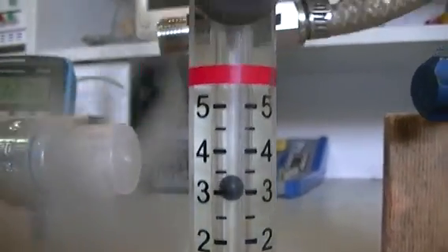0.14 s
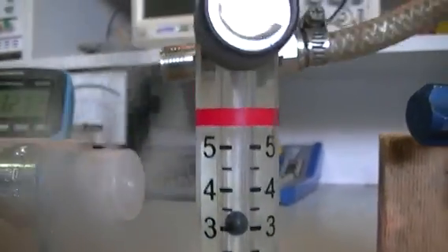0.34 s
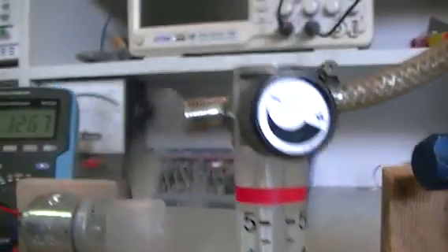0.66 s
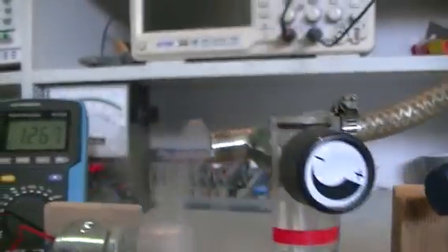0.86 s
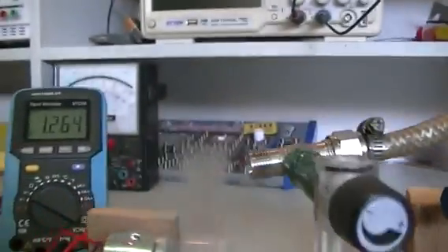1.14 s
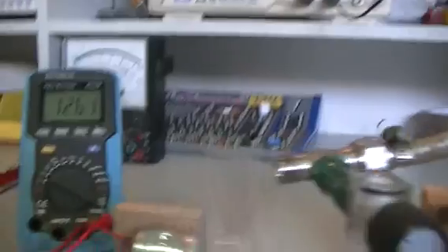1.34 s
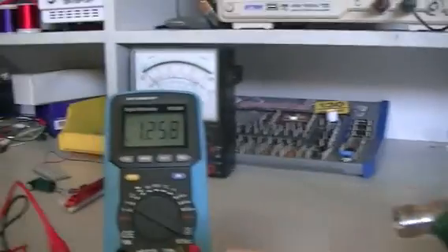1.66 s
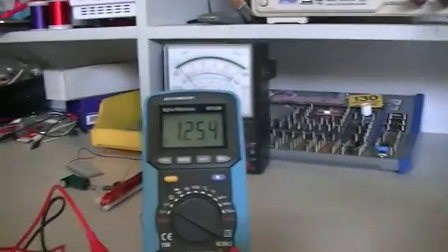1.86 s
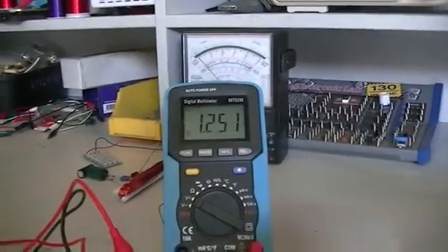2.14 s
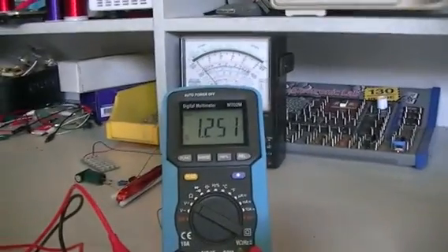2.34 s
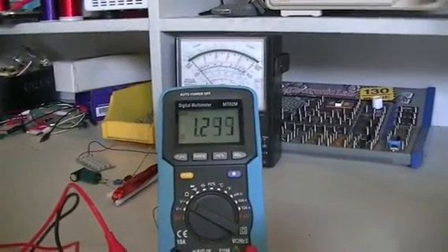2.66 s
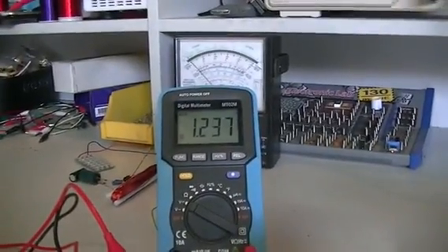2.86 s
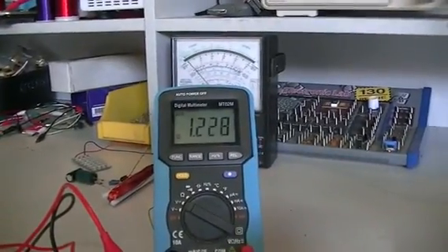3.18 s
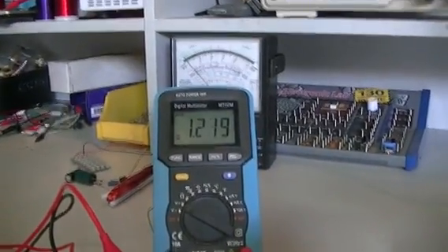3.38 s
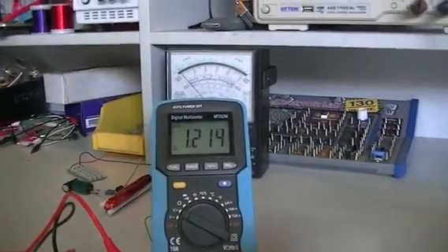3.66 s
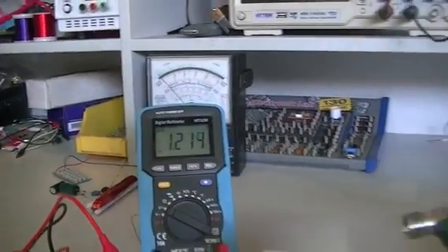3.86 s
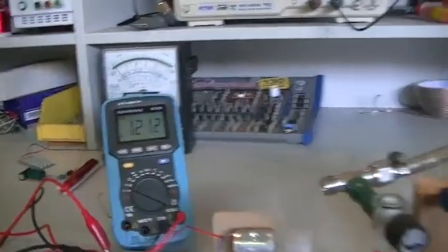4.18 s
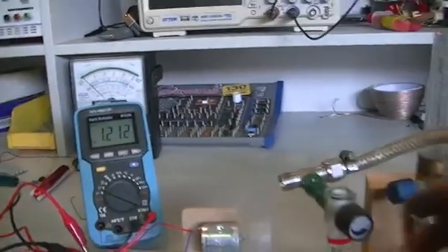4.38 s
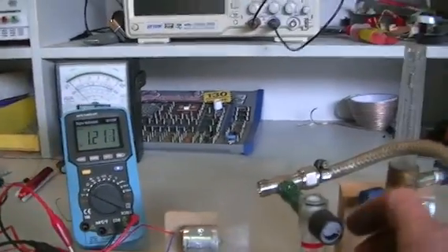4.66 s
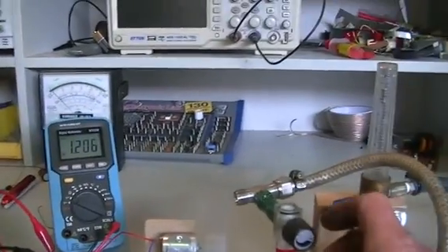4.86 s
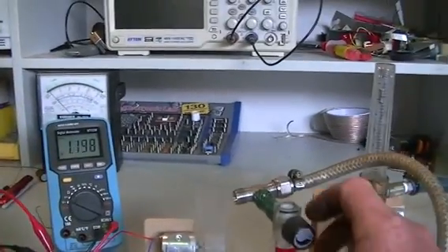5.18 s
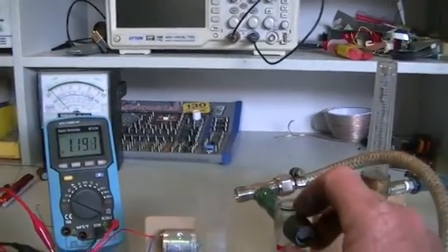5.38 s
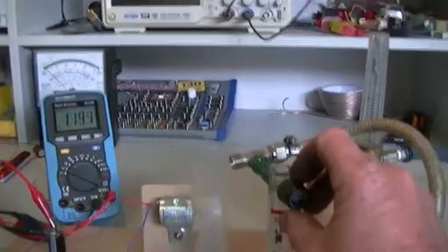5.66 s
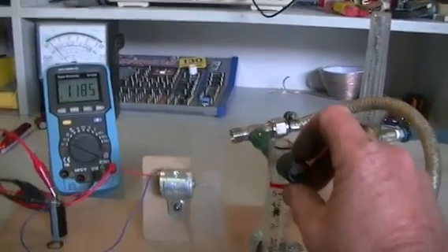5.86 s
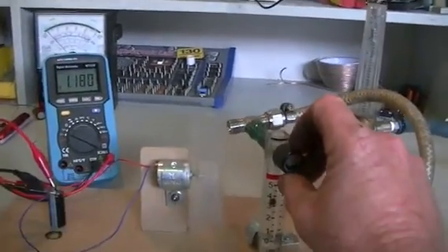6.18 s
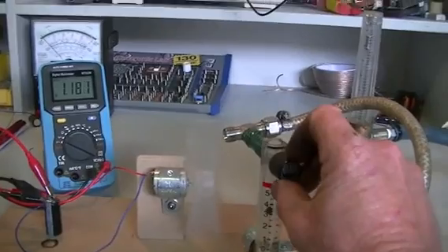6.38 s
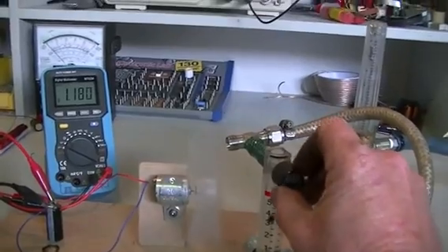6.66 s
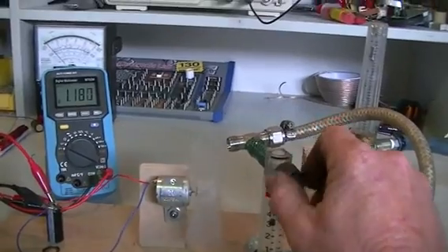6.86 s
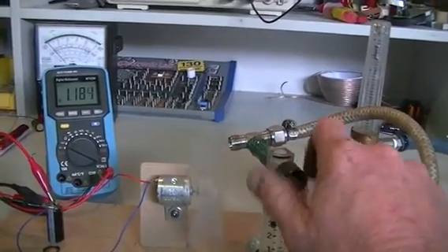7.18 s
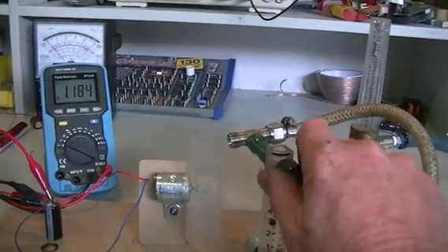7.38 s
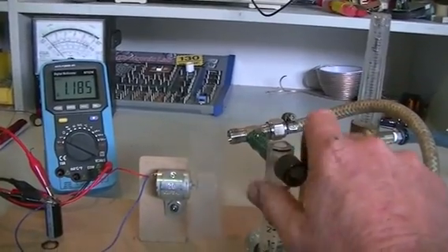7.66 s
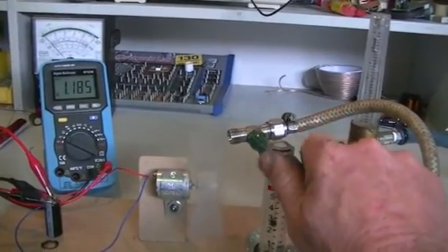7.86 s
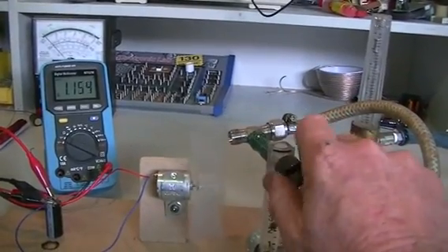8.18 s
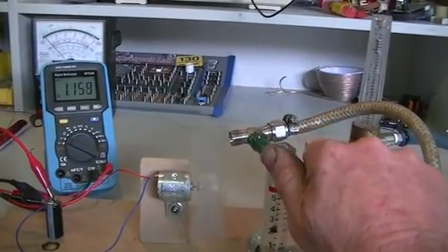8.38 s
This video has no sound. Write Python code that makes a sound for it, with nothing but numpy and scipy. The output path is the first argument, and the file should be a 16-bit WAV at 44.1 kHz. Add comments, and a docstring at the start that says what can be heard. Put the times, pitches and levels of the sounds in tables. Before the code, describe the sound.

A loud, steady jet of compressed air hisses up close onto a small fan, its bright hollow whistling colour sliding downward as the microphone moves.

```python
"""A hiss up close first: a steady jet of compressed air from a nozzle onto a small fan on a workbench.
The microphone starts at the nozzle, moves along the bench, then draws back. The jet is noise, coloured
for each place; close reflections comb it with notches that slide down and partly back.
The hiss throbs in some bands and eddies make it uneven. Behind it the fan hums faintly, sinking in pitch,
as sines locked to its turning rate."""
import sys
import numpy as np
from scipy import signal
from scipy.fft import rfft, irfft
from scipy.io import wavfile
from scipy.ndimage import uniform_filter1d

SR = 44100
rng = np.random.default_rng(int(sys.argv[2]) if len(sys.argv) > 2 else 0)


def wrap_up_sound(samples):
    """Save the sound to the file named by the first command line argument, as 16-bit audio."""
    columns = np.atleast_2d(samples).T
    # keep every value between -1 and 1, then stretch to whole-number steps
    tamed = np.clip(columns, -1, 1)
    steps = np.round(tamed * 32767).astype(np.int16)
    wavfile.write(sys.argv[1], SR, steps)


N = 376173  # samples, about 8.5 s

# broad spectrum of the jet, levels relative:
# pitch_hz, nozzle_db, bench_db, drawn_back_db
JET_COLOUR = [(347, -79, -81, -81.5), (457, -71.5, -72.5, -74), (725, -70, -72, -68.5),
              (1030, -68, -68, -69), (2630, -68, -64.5, -65.0), (4040, -61.4, -63.4, -62),
              (5130, -66, -58, -56.5), (8200, -54.5, -57.5, -56.5), (9780, -56, -63, -56.5),
              (10690, -69, -71.5, -67.5), (12600, -63, -64.5, -67.5), (13750, -68.9, -71.1, -72.4),
              (14500.0, -82.5, -86.8, -88.8), (15300.0, -77, -79, -79.7)]
# resonances of the nozzle and the things around it, heights above the broad spectrum:
# pitch_hz, width_hz, nozzle_db, bench_db, drawn_back_db
NOZZLE_RESONANCES = [(404, 43, 4, 4.5, 5), (1095, 53, 4.5, -2, 6.5), (1189, 120, 7, 2.5, 7),
                     (1613, 230, 3.5, 6.5, 3), (1887, 330, 3.5, 0.6, 6), (2970, 240, 1.5, 1.5, 5.5),
                     (3425, 360, 4, 5, 7), (4300, 260, 6, 3, 1), (4610, 145, 4.5, 3.5, 4),
                     (4944, 320, 7, 6, -1), (5323, 550, 8, 5, 5.5), (6900, 240, 1, 7.5, 3),
                     (7240, 300, 8, 4.5, 3), (7560, 380, 1, 1.8, 5), (9110, 290, 5.5, -0.2, 5),
                     (9760, 260, .3, 5, 3), (11130, 500, 0.5, 1, -3.5), (12100, 500, 1.5, -5.5, 2.5)]
JET_DB = -16  # rms of the whole hiss
FRAME, HOP = 1024, 256  # samples
SWING_TILT_DB = .3  # an octave: brighter as the microphone swings past the jet between two places
# towards the end the low part of the hiss fills out
FILL_FROM_S, FILL_DB_PER_S, FILL_BELOW_HZ = 6.5, .9, 1500


def jet(bass_hz=290, bass_order=1.75, pivot_hz=6000):
    """Turbulent hiss coloured for three places, blended as the microphone moves, combed by reflections."""
    source = turbulence()
    echoed = [shelves(source) for _ in range(3)]  # other echoes at each place
    hz, t, bands = signal.stft(echoed, SR, nperseg=FRAME, noverlap=FRAME - HOP)
    place = microphone_place(t)
    level_db, _, _ = heard_at(place)
    shares = np.maximum(1 - abs(np.clip(place, 0, 2) - np.arange(3)[:, None]), 0)
    bands = (bands * shares[:, None]).sum(0)

    colour_db = read(JET_COLOUR, hz).T
    for centre, width, *heights_db in NOZZLE_RESONANCES:
        colour_db = colour_db + np.outer(bell_curve(hz, centre, width), heights_db)

    between = np.sin(np.pi * place) ** 2
    octaves = np.log2(np.maximum(hz, bass_hz) / pivot_hz)
    tilt_db = SWING_TILT_DB * np.outer(octaves, between)
    low_part = np.exp(-(hz / FILL_BELOW_HZ) ** 2)
    fill_db = FILL_DB_PER_S * np.outer(low_part, np.maximum(t - FILL_FROM_S, 0))
    # so thin a jet radiates little bass
    bass = np.minimum(hz[:, None] / bass_hz, 1) ** bass_order

    total_db = colour_db @ shares + level_db + tilt_db + fill_db + comb_db(hz, t)
    hiss = signal.istft(bands * gain_of(total_db) * bass, SR, nperseg=FRAME, noverlap=FRAME - HOP)[1][:N]
    return gain_of(JET_DB) * evened(hiss)


# how strongly each part of the hiss takes part in the throb, negative in opposite phase:
# pitch_hz, depth_factor
THROB_BANDS = [(3800, -0.23), (5000, 0.95), (5900, 0.3), (6800, 1.57), (8000, 0.7), (9100, 0.5),
               (9900, -2.5), (11000, 0.8), (14000, .2)]
THROB_HZ, THROB_SAG_HZ_PER_S = 29.78, 0.269  # rate at the start, and its slowing


def turbulence(eddy_db=0.62, grit_db=0.97, surge_db=0.29, surge_hz=14, throb_gain=1.18, flutter_db=0.53):
    """White noise that throbs and flutters band by band, while eddies lift one band or another."""
    hz, t, bands = signal.stft(rng.standard_normal(N), SR, nperseg=256, noverlap=192)
    _, depth, _ = heard_at(microphone_place(t))
    rate = THROB_HZ - THROB_SAG_HZ_PER_S * t
    phase = 2 * np.pi * np.cumsum(rate) * t[1]  # t[1] is the time step
    share = read(THROB_BANDS, hz).T
    throb = 1 + throb_gain * share * depth * np.cos(phase)

    eddies_db = eddy_db * patches(bands.shape, frames_size=16, bins_size=10)
    eddies_db = eddies_db + grit_db * patches(bands.shape, frames_size=2, bins_size=12)
    # the bands that throb also flutter at random
    flutter = abs(share) * patches(bands.shape, frames_size=18, bins_size=26)
    eddies_db = eddies_db + flutter_db * flutter

    hiss = signal.istft(bands * throb * gain_of(eddies_db), SR, nperseg=256, noverlap=192)[1][:N]
    return hiss * gain_of(surge_db * wander(surge_hz))


# the path of the microphone, place 0 at the nozzle, 1 along the bench, 2 drawn back:
# time_s, place
MICROPHONE_PATH = [(0, 0), (.4, .22), (1.25, .16), (1.6, 0.95), (3.55, 1.01), (4.3, 1.93)]


def microphone_place(t):
    """Where the microphone is at the times t, gliding between the points of its path."""
    place, = follow(MICROPHONE_PATH, t)
    return place


# what changes from place to place, level relative, depth before the factors of the throb:
# place, level_db, throb_depth, notch_spacing_hz
PLACE_SETTINGS = [(0, .2, .15, 2600), (.22, .1, .14, 2750), (1, .1, 0.19, 2500), (1.6, -1.2, .12, 2350),
                  (2, -.3, .08, 2100)]


def heard_at(place):
    """Level, throb depth and notch spacing, which vary with the distance along the path."""
    return follow(PLACE_SETTINGS, place)


# how well the close surfaces reflect:
# pitch_hz, share
SURFACE_REFLECTANCE = [(2000, .05), (5000, 1.05), (9000, 1.1), (11000, .55), (15000, .25)]
# the slide of the comb as the microphone moves, depth before the reflectance:
# time_s, middle_notch_hz, depth_db
NOTCH_SLIDE = [(0, 9370, 6), (.45, 8680, 9.5), (.7, 7940, 11), (.9, 7620, 7.5), (1.1, 6730, 4.5),
               (1.35, 6100, 5.5), (1.9, 5800, 5.8), (3.55, 5820, 6), (4.1, 6400, 7), (4.6, 6700, 3),
               (5.5, 7000, 0)]
# the crest under the middle notch whistles and slides with it: its lowest pitch,
# its rise with the notch at its highest, and the power of the law between
CREST_HZ, CREST_RISE_HZ, CREST_BEND = 4980, 1400, .6
CREST_DB, CREST_FADE_HZ = 3.2, 2600  # height at the nozzle before the fade, and the notch rise that fades it
CREST_SHARE_FAR = .2  # share of that height left with the microphone drawn back


def comb_db(hz, t, notch_width=.4, crest_width_hz=550):
    """Reflections cancel the direct hiss at evenly spaced notches, which slide as the microphone moves."""
    middle, depth_db = follow(NOTCH_SLIDE, t)
    place = microphone_place(t)
    _, _, spacing = heard_at(place)
    off_notch = np.sin(np.pi * (hz[:, None] - middle) / spacing)
    notch = 1 / (1 + (off_notch / notch_width) ** 2)
    average = notch_width / np.hypot(1, notch_width)  # between the notches the reflections add
    notches_db = depth_db * read(SURFACE_REFLECTANCE, hz).T * (average - notch)

    raised = middle - middle.min()
    crest_hz = CREST_HZ + CREST_RISE_HZ * (raised / raised.max()) ** CREST_BEND
    crest = bell_curve(hz[:, None], crest_hz, crest_width_hz)
    crest_share = np.interp(place, [0, 2], [1, CREST_SHARE_FAR])
    crest_db = CREST_DB * crest_share * np.exp(-(raised / CREST_FADE_HZ) ** 2)
    return notches_db + crest_db * crest


def shelves(x, wet_db=-9.0, t60=0.053, lowest_hz=1100):
    """Small echoes from shelves and instruments ripple the treble finely; long waves pass them by."""
    t = np.arange(SR // 8) / SR
    taps = rng.standard_normal(len(t)) * gain_of(-60 * t / t60) * (t > .003)
    taps = signal.lfilter(*signal.butter(1, lowest_hz, "high", fs=SR), taps)
    echoes = signal.fftconvolve(x, taps / np.linalg.norm(taps))[:N]
    wet = gain_of(wet_db)
    return (x + wet * echoes) / np.hypot(1, wet)


# faint low tones that swell and fade, sinking with the fan, levels before the waver:
# middle_s, length_s, multiple_of_turning_rate, level_db
FAN_HUMS = [(2.3, 1.4, 2, -69), (4.4, .6, 2, -70.5), (6.1, 1.4, 2.79, -66), (6.1, 1.4, 2.26, -72),
            (6.4, 1.8, 4.31, -66), (8.2, 1.6, 2, -71)]
# the blade tone swells now and then, levels before the waver:
# middle_s, length_s, level_db
BLADE_SWELLS = [(.05, 0.25, -63), (1.14, .24, -57), (1.47, .24, -57), (1.85, .15, -58), (2.62, .18, -59),
                (2.97, .2, -60), (3.47, 0.27, -56), (3.94, .2, -60), (4.38, .2, -63)]
FAN_HZ, FAN_SAG_HZ_PER_S = 78.6, 1.17  # turns a second at the start, and their slowing
BLADES = 3
BLADE_NEAR_DB, BLADE_FAR_DB = -66.5, -78  # blade tone between swells, at the nozzle and drawn back


def fan(shaft_db=-83, twice_db=-80, waver_db=2.5):
    """The sagging rotor hums at one, two and three times its turning rate; other faint tones come and go."""
    t = np.arange(N) / SR
    angle = 2 * np.pi * np.cumsum(FAN_HZ - FAN_SAG_HZ_PER_S * t) / SR
    blade_db = np.interp(microphone_place(t), [0, 2], [BLADE_NEAR_DB, BLADE_FAR_DB])
    tones = gain_of(shaft_db) * np.sin(angle)
    tones = tones + gain_of(twice_db) * np.sin(2 * angle)
    tones = tones + gain_of(blade_db) * np.sin(BLADES * angle)
    for middle, length, multiple, db in FAN_HUMS:
        tones = tones + gain_of(db) * swell(t, middle, length) * np.sin(multiple * angle)
    for middle, length, db in BLADE_SWELLS:
        tones = tones + gain_of(db) * swell(t, middle, length) * np.sin(BLADES * angle)
    # root 2 makes the levels rms
    return np.sqrt(2) * tones * gain_of(waver_db * wander(rate_hz=5.5))


def swell(t, middle, length):
    """A bell-shaped rise and fall."""
    return np.exp(-(2 * (t - middle) / length) ** 2)


def bell_curve(hz, centre, width):
    """The peak of a resonance: 1 at the centre, half at half the width to either side."""
    return 1 / (1 + (2 * (hz - centre) / width) ** 2)


def patches(shape, frames_size, bins_size):
    """A random field of rms 1, smooth over so many frames and bins."""
    field = uniform_filter1d(rng.standard_normal(shape[::-1]), frames_size, axis=0)
    return evened(uniform_filter1d(field, bins_size, axis=1)).T


def wander(rate_hz):
    """Slow chance of rms 1, with little faster than rate_hz."""
    hz = np.fft.rfftfreq(N, 1 / SR)
    spectrum = rfft(rng.standard_normal(N)) / (1 + (hz / rate_hz) ** 2)
    return evened(irfft(spectrum, N))


def follow(rows, x):
    """Each further column of a curve table at the points x of its first, in straight lines."""
    points, *columns = np.transpose(rows)
    return [np.interp(x, points, column) for column in columns]


def read(rows, hz):
    """Each column of a spectrum table at the frequencies hz, in straight lines over log frequency."""
    f, *columns = np.transpose(rows)
    return np.array([np.interp(np.log(hz + 1), np.log(f), column) for column in columns])


def gain_of(db):
    """Decibels to amplitude."""
    return 10 ** (np.asarray(db) / 20)


def evened(x):
    """Scales to rms 1."""
    return x / np.sqrt(np.mean(x ** 2) + 1e-20)


def scene():
    """Jet and fan at one microphone, the same in both channels."""
    return np.tile(jet() + fan(), (2, 1))


EDGE_HZ = 15720


def record(dry):
    """The recorder's band limit: a steep low-pass."""
    low_pass = signal.firwin(1023, EDGE_HZ, window=("kaiser", 9), fs=SR)
    return signal.oaconvolve(dry, low_pass[None], "same")


dry = scene()
out = record(dry)
wrap_up_sound(out)
```